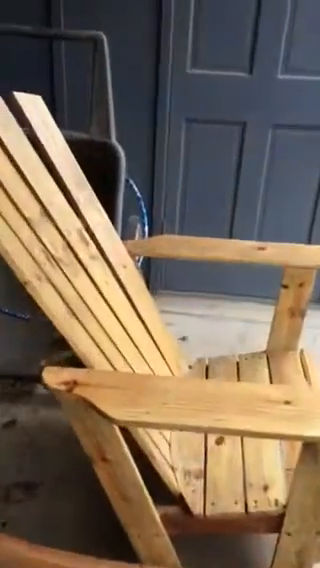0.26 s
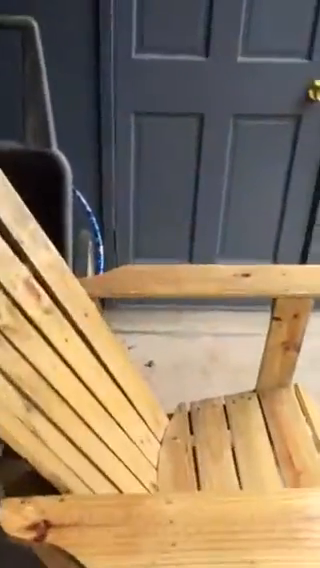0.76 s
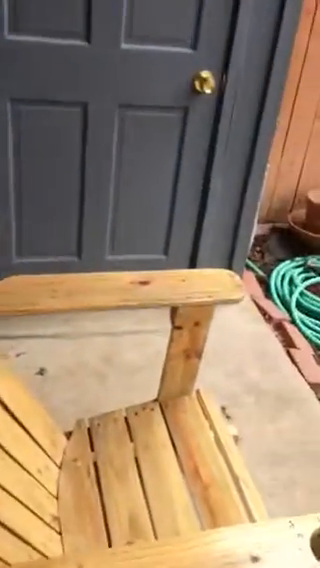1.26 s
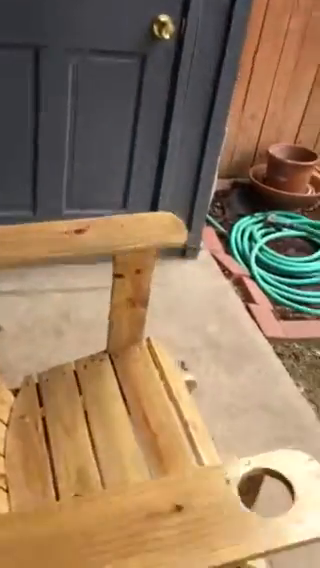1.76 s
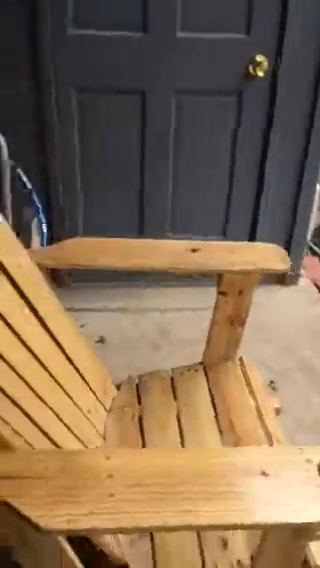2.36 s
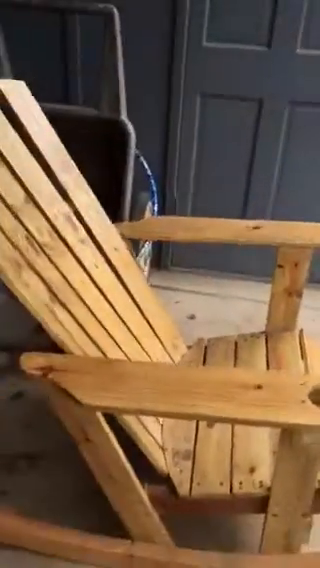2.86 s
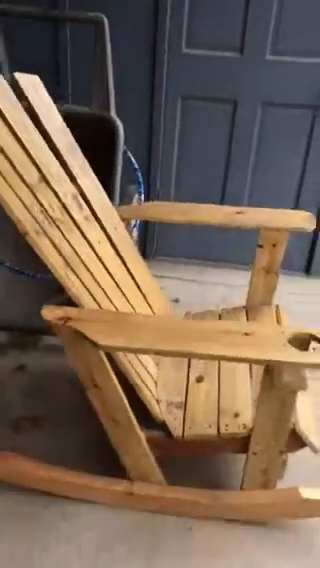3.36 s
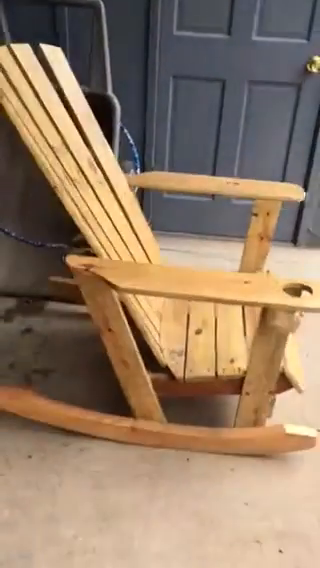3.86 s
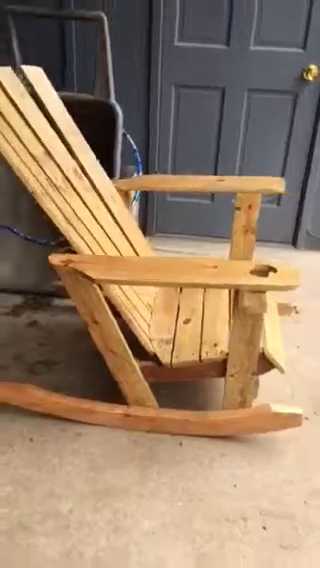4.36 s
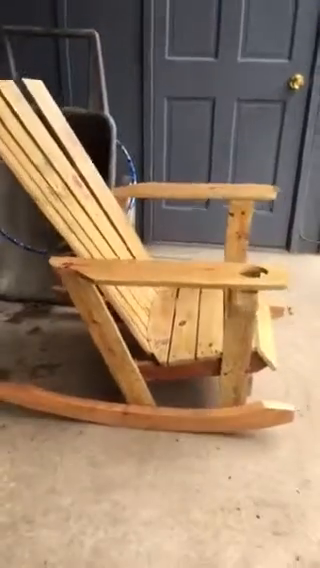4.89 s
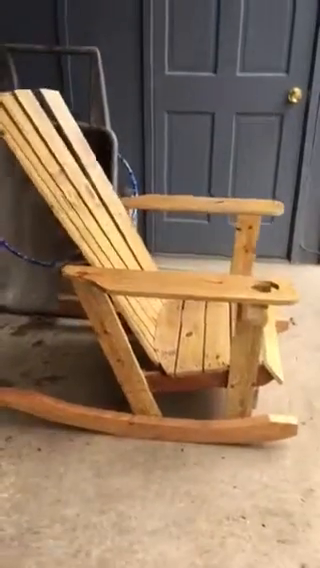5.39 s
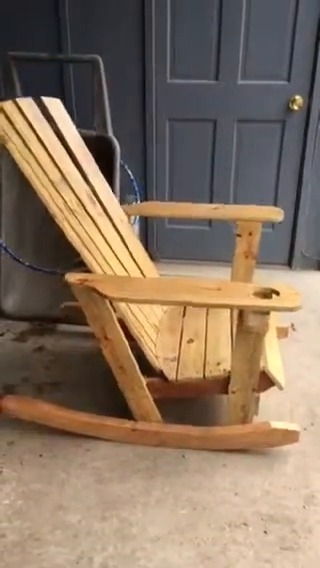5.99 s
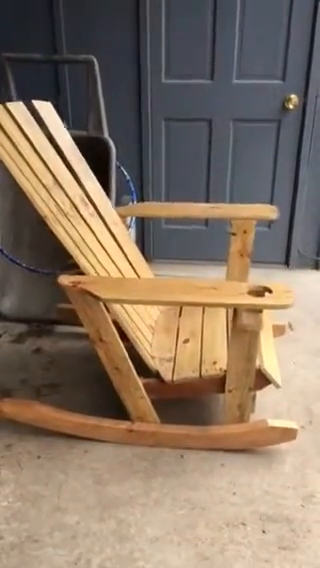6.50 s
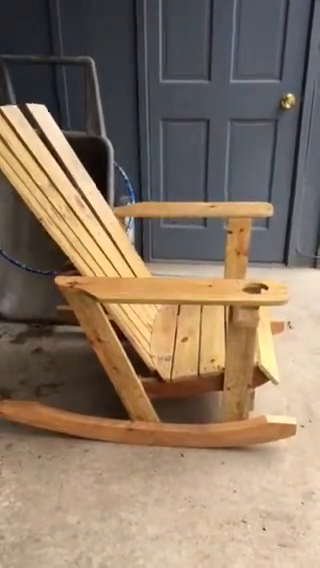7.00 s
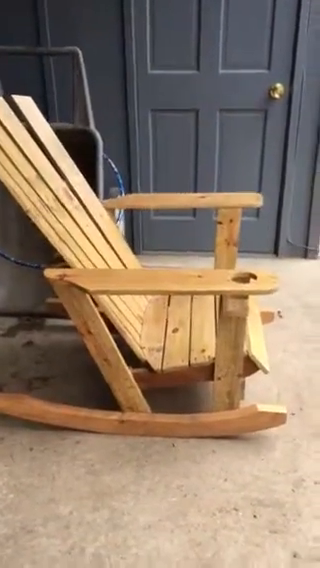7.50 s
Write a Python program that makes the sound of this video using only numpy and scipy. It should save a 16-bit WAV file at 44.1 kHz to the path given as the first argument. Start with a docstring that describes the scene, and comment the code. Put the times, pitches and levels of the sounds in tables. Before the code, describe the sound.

Nearly quiet outdoor air with a low unsteady hum, then a rocking chair's slats and runners knock harder, peaking in a sharp clattering burst with boomy thumps. Afterwards single dry joint ticks land with soft thuds about every half second, gradually fading. Runners scrape very faintly on grit; tiny bird chirps are barely audible. Close phone microphone, hard walls giving a short echo.

```python
"""A slatted wooden rocking chair rocks on a concrete porch, a metre or two from a phone.
Its dry joint ticks and its slats and runners knock: rough slips of noise, also ringing through damped wood.
Runners grind noise grains over grit, hiss swells around the knocks, and the frame thuds in low modes.
Sliding narrow noise makes distant bird chirps and a low groan; these, the ticks and the knocks get a short
porch echo of decaying noise. Outdoor rumble and town wash, both wavering filtered noise, lie behind."""
import sys
import numpy as np
from scipy import signal
from scipy.fft import rfft, irfft
from scipy.io import wavfile
from scipy.ndimage import uniform_filter1d

SR = 44100
rng = np.random.default_rng(int(sys.argv[2]) if len(sys.argv) > 2 else 0)


def to_wav(s):
    """Save 16-bit WAV."""
    ch = np.atleast_2d(s).T  # columns
    pcm = np.round(np.clip(ch, -1, 1) * 32767)  # PCM
    wavfile.write(sys.argv[1], SR, pcm.astype(np.int16))


N = 341578
TIME = np.arange(SR // 3) / SR  # s, the span of one short event or echo

# Runners grinding steadily over grit. Each row: time in seconds, level in dB.
GRIT_LEVEL = [(0, -71.5), (1.1, -79.5), (3, -78.5), (5.5, -79.5), (7.75, -81.5)]
# Swells of grainy hiss around the knocks, many of them knock tails.
# Each row: loudest moment in seconds, level in dB.
HISS_SWELLS = [(.71, -63.5), (1.66, -83), (1.85, -66.5), (2.26, -71), (2.42, -76.5), (2.67, -55.5),
               (3.15, -67.5), (3.54, -63), (4.15, -71.5), (4.28, -75)]
# Colour of the grit and hiss. Each row: frequency in Hz, level in dB.
GRIT_COLOUR = [(600, -17), (1500, 1.5), (4000, -2), (9000, -9.5), (16000, -13)]
# Broad resonances of the distant rumble. Each row: centre in Hz, width in Hz.
RUMBLE_PEAKS = [(58, 32.4), (92, 23), (170, 156)]
# Deepest drone of the rumble. Each row: time in seconds, level in dB.
DEEP_LEVEL = [(0, -55.5), (.45, -57.5), (1.2, -53), (1.8, -50.5), (2.5, -52.5), (3.3, -62), (3.85, -49.5),
              (4.3, -55.5), (4.7, -61), (5, -52), (5.45, -56.5), (5.65, -49), (5.9, -55.5), (6.25, -49.5),
              (6.65, -60), (6.9, -50.5), (7.3, -51.5), (7.75, -59.5)]
# Second drone. Each row: time in seconds, level in dB.
HUM_LEVEL = [(0, -54), (.7, -68), (1.2, -60.5), (1.6, -79), (2.55, -54), (3.25, -52), (3.8, -66),
             (4.099, -60.5), (5.001, -72.5), (5.7, -80.5), (7.75, -54)]
# Broad third drone. Each row: time in seconds, level in dB.
BROAD_LEVEL = [(0, -62), (1.6, -59.5), (2.6, -61.5), (4.25, -63), (4.6, -64), (7.75, -66)]
# Colour of the distant town wash. Each row: frequency in Hz, relative density in dB per Hz.
OUTDOORS_COLOUR = [(88, -26.5), (150, -5), (356, -7), (488, -11.5), (916, -7.5), (4870, -36), (9150, -35.5),
                   (10500, -34.5), (12300, -34), (15300, -29.5), (16500, -40.5)]
# Frame on the slab. Each row: start in seconds, peak in dB, seat modes share in dB, arm modes share in dB.
THUDS = [(0.513, -48.5, -2, -4), (1.189, -56, -19, -4), (1.64, -47, -33, -11), (1.79, -41, -18, -27),
         (2.251, -30, -1, 0), (2.447, -49, -8, -2), (2.586, -25, 9, 9.5), (3.132, -31, -4, -4),
         (3.403, -29, 3, -1), (3.528, -45.5, 6, -9), (3.909, -38, 6, -4.5), (4.174, -26.5, -0.5, -5.5),
         (4.676, -36, 2, -6.5), (4.898, -28.5, -2, -9), (5.398, -40.5, 5, -4), (5.597, -34.5, -12.5, -17),
         (6.05, -43.5, 5, 1), (6.225, -38, -14, -15.5), (6.662, -45, 0, -26), (6.852, -44, -13, -19)]
# Frame modes, lowest pair, then seat pair, then arms. Each row: frequency in Hz, level in dB, T60 in seconds.
FRAME_MODES = [(61, 7, 0.3), (64.4, 7, 0.17), (112.7, 1.5, 0.28), (132.6, -1.5, 0.41), (209, -4.5, 0.04),
               (257, -5.5, 0.15), (289.5, 1.5, 0.16), (351, -3.5, 0.16), (378.6, -6.5, 0.081),
               (446, -7.5, 0.045)]
# Slats and runners. Each row: start in seconds, peak in dB, bass in dB, brightness in dB, ring share in dB.
KNOCKS = [(0.692, -56, -20, 19, -14), (0.7164, -37, -29, -1, -0.5), (1.6145, -43.5, -5, 9, -6.5),
          (1.678, -38.5, -16, -1, -11.5), (1.7601, -24.5, -5, -1.5, -16), (2.2977, -13, -3, 9.5, -4.5),
          (2.589, -19.5, -25.5, -0.5, -12.5), (3.3948, -49, 6, 4, -2.5), (3.516, -51.5, -9, -14, 0),
          (3.5635, -32.5, -13.5, 1, -6.5), (4.103, -47, 5, -0.5, -8), (4.1999, -44, 5, 3.5, -10),
          (6.9466, -55, 2, -4, -1.5)]
# Modes of the slats. Each row: frequency in Hz, level in dB, T60 in seconds.
SLAT_MODES = [(700, -6, .012), (1100, -2, .014), (1300, -2, .012), (1560, 0, .016), (1760, -1, .02),
              (2100, -1, .012), (2350, -2, .01), (2900, -7, .007), (3600, -7, .006)]
# Distant bird chirps, with a low groan last.
# Each row: start in seconds, start pitch in Hz, end pitch in Hz, level in dB, hold in seconds.
CHIRPS = [(1.916, 3650, 2985, -64, 0.038), (1.972, 3550, 3190, -66, 0.039), (2.93, 3100, 3020, -82, 0.14),
          (5.615, 3260, 3250, -65.5, .02), (5.652, 2920, 2920, -71, 0.019), (5.679, 3120, 3050, -79, 0.067),
          (6.249, 706, 772, -72.5, .17)]
# Dry joint. Each row: start in seconds, peak in dB, brightness in dB, ring share in dB.
TICKS = [(2.107, -54.5, -1, -12), (2.215, -43.5, -6, -20), (2.2674, -17, 4.5, -7.5),
         (2.5244, -46.5, -19, -16), (2.5778, -34, -4, -4), (2.6012, -20.5, -4, -17),
         (2.674, -45.5, -16, -9), (2.7575, -41.5, -11, -21), (2.7675, -29.5, -3.5, -6),
         (3.0959, -32.5, -2.5, -18), (3.129, -34, -1, -12.5), (3.4175, -47, -4, -7), (3.4391, -49, 3, -4),
         (3.8597, -53, 4, -14), (3.878, -48, 3, -9), (3.926, -42.5, -3.5, -14), (4.16, -53, -2, 2),
         (4.2877, -51.5, -3, -11), (4.307, -51, -7, -12), (4.326, -45.5, -8, -16), (4.352, -50, 6, -7),
         (4.8885, -29.5, 3, -1.5), (5.086, -57.5, -17, -7.5), (5.1936, -56, -14.5, -10),
         (5.3977, -42.5, 0, -1), (5.5692, -36.5, 3.5, -2), (6.0434, -39, 1, 6.5),
         (6.1878, -52.5, -2.5, -12), (6.2886, -57.5, 0.5, -11), (6.6543, -38.5, 0, -1),
         (7.495, -48, -15.5, -11)]
# Modes of the joint. Each row: frequency in Hz, level in dB, T60 in seconds.
JOINT_MODES = [(1040, -3, .05), (1600, -10, .025), (2070, 1, .05), (3480, -1, .04), (4460, -5, .025),
               (5800, -5, .02), (6650, -5, .025), (8900, -4, .012)]
# Where bass, body, presence and treble sit, in Hz.
TILT_HZ = [650, 1700, 4000, 10000]
# Response of the microphone port. Each row: frequency in Hz, level in dB.
PORT_RESPONSE = [(4000, -1), (5000, -1.5), (6100, 1.5), (7700, -2.5), (9200, 1.5), (10500, -5.5),
                 (12000, -1.5), (14000, -7.5), (16000, -12.5)]

SWELL_RISE_DB_S, SWELL_FALL_DB_S = 86.5, 87.5  # dB per second
OUTDOORS_DB = -64.5
ROLL_ON_S = 0.02562
SHUDDER_DB, SHUDDER_T60_S, SHUDDER_HZ = -7, 0.4, (68, 420)
LEAD = 256  # samples of room ahead of every click, for the colouring
KNOCK_SLIP_S, KNOCK_TREBLE_DB = 0.003, -16.5
PORCH_T60_S, PORCH_TREBLE_T60_S, PORCH_DB, PORCH_TREBLE_DB = 0.14, 0.12, -2, -6.5
YARD_T60_S, YARD_DB = 0.47, -16
CHIRP_ATTACK_S, CHIRP_RELEASE_S = 0.008, 0.012
CHIRP_WIDTH = 0.04  # spread to either side, as a share of the starting pitch
TICK_SLIP_S, TICK_BASS_DB, TICK_PRESENCE_DB, TICK_TREBLE_DB = 0.0021, 1, -1.5, 1.5
BASS_CUT_HZ, TOP_HZ = 42, 16300
CEILING = 0.2  # amplitude the loudest peaks bend towards


def undb(db):
    """Amplitude ratio of a level in dB."""
    return 10 ** (np.asarray(db) / 20)


def band(x, lo_hz, hi_hz, order=2):
    """Causal band-pass."""
    return signal.sosfilt(signal.butter(order, [lo_hz, hi_hz], "bandpass", fs=SR, output="sos"), x)


def unit(x):
    """Scale to an RMS of 1."""
    return x / np.sqrt(np.mean(x ** 2))


def peak(x):
    """Scale to a peak of 1."""
    return x / np.abs(x).max()


def fade(t60):
    """Exponential decay, 60 dB in t60 seconds."""
    return np.exp(-np.log(1000) * TIME / t60)


def walk(rate):
    """Random levels held 1 / rate s and slewed twice; spread near 1."""
    hold = int(SR / rate)
    steps = np.repeat(rng.standard_normal(N // hold + 1), hold)
    return 1.3 * uniform_filter1d(uniform_filter1d(steps, hold), hold)[:N]


def tilt(x, hz, db):
    """Colour x by straight lines between (Hz, dB) points on a log-frequency axis."""
    f = np.maximum(np.arange(x.shape[-1] // 2 + 1) * SR / x.shape[-1], 1)
    return irfft(rfft(x) * undb(np.interp(np.log(f), np.log(hz), db)), x.shape[-1])


def add(out, s, x):
    """Mix x into out from time s."""
    i = int(s * SR)
    out[i:i + len(x)] += x[:N - i]


def ring(modes, scatter_db, turn=0):
    """The modes of a body; every blow lands elsewhere and wakes them differently."""
    hz, db, t60 = np.array(modes, float).T[:, :, None]
    chance = rng.standard_normal((3, len(modes), 1))  # for level, pitch and phase
    angle = 2 * np.pi * hz * (1 + 0.0058 * chance[1]) * TIME + turn * chance[2]
    return np.sum(undb(db + scatter_db * chance[0]) * fade(t60) * np.sin(angle), axis=0)


def clicks(events, slip_s, modes, snap, chatter_db, chatter_t60):
    """A short rough slip and a dying chatter, heard directly and through damped wood a snap can also drive."""
    out = np.zeros(N)
    for s, peak_db, bass_db, presence_db, treble_db, ring_db in events:
        envelope = np.exp(-TIME / slip_s) + undb(chatter_db) * fade(chatter_t60)
        slip = rng.standard_normal(len(TIME)) * envelope
        push = slip.copy()
        push[0] += snap  # the first break-free drives the wood hardest
        wood = signal.fftconvolve(push, ring(modes, 1.))[:len(TIME)]
        both = unit(band(slip, 250, 18000, order=1)) + undb(ring_db) * unit(wood)
        coloured = tilt(np.roll(both, LEAD), TILT_HZ, [bass_db, 0, presence_db, treble_db])
        add(out, s - LEAD / SR, undb(peak_db) * peak(coloured))
    return out


def grit():
    """Dense tiny grains in uneven flurries: steady grinding under the runners, and swells of grainy hiss."""
    t = np.arange(N) / SR
    swells = np.zeros(N)
    for s, db in HISS_SWELLS:
        slope_db = np.minimum(SWELL_RISE_DB_S * (t - s), SWELL_FALL_DB_S * (s - t))
        swells += undb(db + slope_db)
    steady = undb(np.interp(t, *np.transpose(GRIT_LEVEL)))
    grains = rng.standard_normal(N) * undb(2. * walk(120) + 1.5 * walk(25))
    return unit(tilt(grains, *np.transpose(GRIT_COLOUR))) * np.hypot(swells, steady)


def rumble():
    """Low distant drone in a few broad resonances, each wavering alone."""
    t = np.arange(N) / SR
    out = np.zeros(N)
    for (hz, width), curve in zip(RUMBLE_PEAKS, (DEEP_LEVEL, HUM_LEVEL, BROAD_LEVEL)):
        drone = unit(band(rng.standard_normal(N), hz - width / 2, hz + width / 2))
        level_db = np.interp(t, *np.transpose(curve)) + 1.5 * walk(5)
        out += drone * undb(level_db)
    return out


def outdoors():
    """Distant town wash in octaves of noise: the low ones swell gently, the hiss on top holds steadier."""
    wash = rfft(tilt(rng.standard_normal(N), *np.transpose(OUTDOORS_COLOUR)))
    f = np.arange(N // 2 + 1) * SR / N
    out, swell = np.zeros(N), walk(0.17)  # all octaves share the slow swell
    for lo in 125 * 2. ** np.arange(8):
        sway_db = min(1000 / lo, 1) * (.6 * swell + .8 * walk(4))
        octave = irfft(wash * (f >= lo) * (f < 2 * lo), N)
        out += undb(sway_db) * octave
    return unit(out) * undb(OUTDOORS_DB)


def thuds():
    """The weight rolls onto the runner, so frame modes swell before they die; the rough slab adds a shudder."""
    out = np.zeros(N)
    roll_on = 1 - np.exp(-(TIME / ROLL_ON_S) ** 2)
    for s, peak_db, seat_db, arm_db in THUDS:
        rough = unit(band(rng.standard_normal(len(TIME)), *SHUDDER_HZ, order=4))
        shudder = undb(SHUDDER_DB) * rough * fade(SHUDDER_T60_S)
        lowest = ring(FRAME_MODES[:2], 1., turn=2)
        seat = ring(FRAME_MODES[2:4], 1., turn=2)
        arms = ring(FRAME_MODES[4:], 2., turn=2) + shudder
        body = lowest + undb(seat_db) * seat + undb(arm_db) * arms
        add(out, s - ROLL_ON_S / 2, undb(peak_db) * peak(body * roll_on))
    return out


def knocks():
    """Slats and runners knock, dull on top; a harder contact brightens them."""
    rows = [(s, db, bass_db, bright, KNOCK_TREBLE_DB + bright, ring_db)
            for s, db, bass_db, bright, ring_db in KNOCKS]
    return clicks(rows, KNOCK_SLIP_S, SLAT_MODES, snap=0., chatter_db=-7, chatter_t60=.12)


def porch(x):
    """Dense echoes from slab, wall and door, the treble dying first; fences return a fainter, longer tail."""
    noise = rng.standard_normal(len(TIME))
    yard = undb(YARD_DB) * fade(YARD_T60_S)
    low = band(noise, 330, 3134) * (fade(PORCH_T60_S) + yard)
    high = undb(PORCH_TREBLE_DB) * band(noise, 1300, 16000) * (fade(PORCH_TREBLE_T60_S) + yard)
    echo = (low + high) * (1 - np.exp(-TIME / 0.0014))  # builds up over a few ms
    return undb(PORCH_DB) * signal.fftconvolve(x, echo / np.sqrt(np.sum(echo ** 2)))[:N]


def chirps():
    """Bird chirps and a low groan: narrow, breathy tones that slide while they hold, then die away."""
    out = np.zeros(N)
    for s, start_hz, end_hz, db, hold in CHIRPS:
        lowpass = signal.butter(1, CHIRP_WIDTH * start_hz, fs=SR, output="sos")
        wobble = signal.sosfilt(lowpass, rng.standard_normal((2, len(TIME))))
        pitch = np.interp(TIME, [0, hold], [start_hz, end_hz])
        phase = 2 * np.pi * np.cumsum(pitch) / SR
        tone = unit(wobble[0]) * np.cos(phase) + unit(wobble[1]) * np.sin(phase)
        attack = np.minimum(TIME / CHIRP_ATTACK_S, 1)
        release = np.exp(-np.maximum(TIME - hold, 0) / CHIRP_RELEASE_S)
        add(out, s, undb(db) * attack * release * tone)
    return out


def ticks():
    """The dry joint breaks free with a snap; a brighter tick lifts presence and treble together."""
    rows = [(s, db, TICK_BASS_DB, TICK_PRESENCE_DB + bright, TICK_TREBLE_DB + bright, ring_db)
            for s, db, bright, ring_db in TICKS]
    return clicks(rows, TICK_SLIP_S, JOINT_MODES, snap=14., chatter_db=-20, chatter_t60=.08)


def scene():
    """Ticks, knocks and chirps echo in the porch; grit, thuds, rumble and wash are added without echo."""
    echoing = ticks() + knocks() + chirps()
    return (echoing + porch(echoing) + grit() + thuds() + rumble() + outdoors())[None]


def record(dry):
    """The phone drops the deepest bass, rounds loud peaks, ripples treble at its port and cuts the very top."""
    thin = signal.sosfilt(signal.butter(3, BASS_CUT_HZ, "highpass", fs=SR, output="sos"), dry)
    rounded = CEILING * np.tanh(thin / CEILING)
    ported = tilt(rounded, *np.transpose(PORT_RESPONSE))
    return signal.sosfilt(signal.ellip(10, .2, 70, TOP_HZ, fs=SR, output="sos"), ported)


dry = scene()
out = record(dry)
to_wav(out)
```